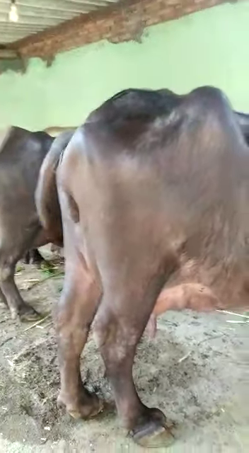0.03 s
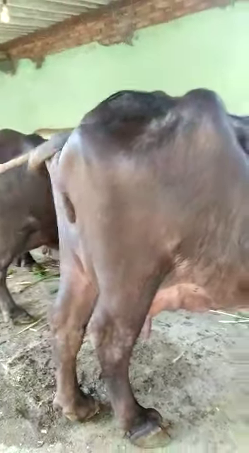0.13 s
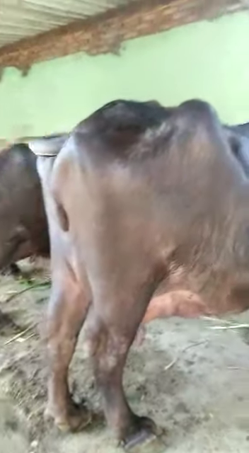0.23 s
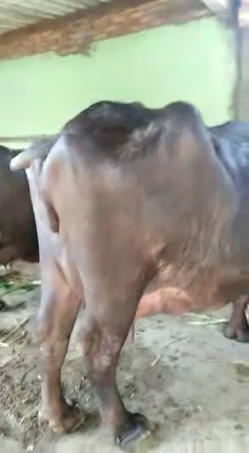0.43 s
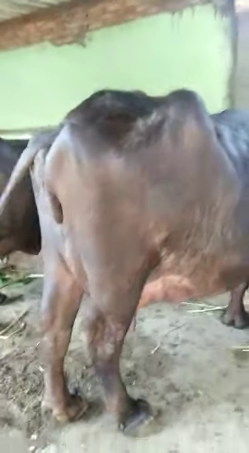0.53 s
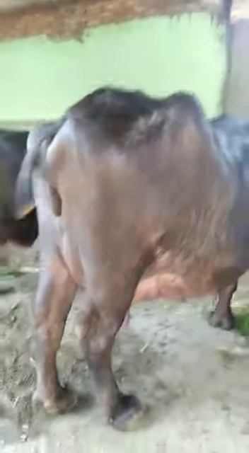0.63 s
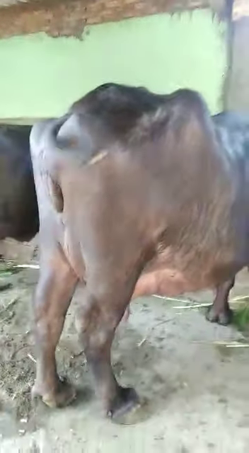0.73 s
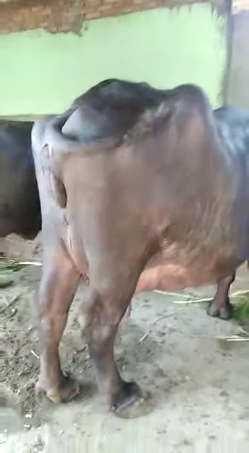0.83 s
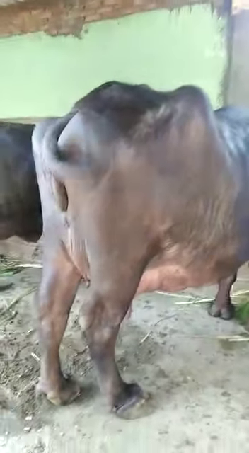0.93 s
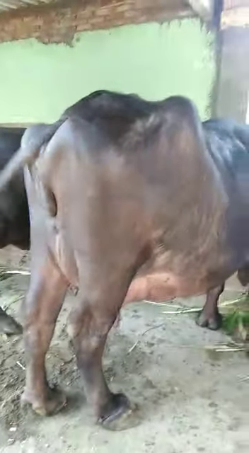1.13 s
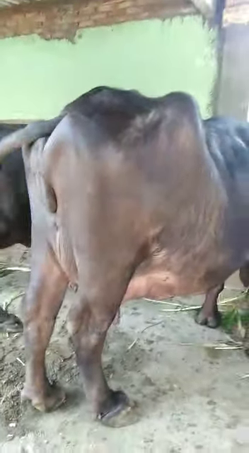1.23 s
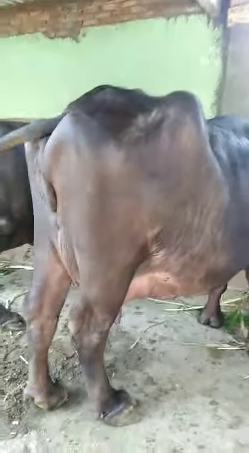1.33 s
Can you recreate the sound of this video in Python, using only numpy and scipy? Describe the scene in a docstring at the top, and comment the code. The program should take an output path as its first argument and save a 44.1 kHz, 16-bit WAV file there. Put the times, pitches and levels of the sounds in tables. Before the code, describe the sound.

A sharp knock with a bright clatter is followed at once by a hollow thud and a brief low ring. Then cattle shift softly on a littered shed floor, heard through a small microphone over constant hiss.

```python
"""A livestock shed, steady hiss throughout. At 0.22 s something hard takes a sharp, ringing knock.
From 0.33 s it bumps down with a hollow, rattling thud; low resonances hang on, one climbing in pitch.
Then cattle scuff and rustle on the littered floor, with one faint tap at 0.87 s.
Contacts and resonances are decaying sines; clatter and scuffs are grains of tiny impacts in noise.
A small two-port microphone hears it all."""
import sys
import numpy as np
from scipy import signal
from scipy.fft import rfft, irfft, next_fast_len
from scipy.io import wavfile
from scipy.ndimage import uniform_filter1d

SR = 44100
rng = np.random.default_rng(int(sys.argv[2]) if len(sys.argv) > 2 else 0)


def put_to_file(sound):
    """Save the sound as 16-bit audio at rate SR, in the file named by the first command-line argument."""
    columns = np.atleast_2d(sound).T  # one column per channel
    safe = np.clip(columns, -1, 1)
    whole_steps = np.round(safe * 32767)
    wavfile.write(sys.argv[1], SR, whole_steps.astype(np.int16))


N = 61739
TIME_S = np.arange(N) / SR

# Contacts of knock, thud and late tap (start [s], level [dB], pitch [Hz], t60 [s])
CONTACT_MODES = [(.2199, -22, 750, .009), (.2203, -30, 2700, .006), (.2222, -23, 1900, .008),
                 (.2226, -22, 4100, .014), (.2228, -26, 7000, .008), (.2222, -29.5, 320, .045),
                 (.2277, -28, 7200, .012), (.3208, -35, 640, .035), (.3212, -40, 350, .06),
                 (.3405, -32, 320, .03), (.3523, -15.5, 1550, .011), (.3595, -19.5, 1450, .008),
                 (.3855, -28, 1200, .012), (.3965, -33, 1700, .02), (.866, -51, 800, .1)]
CONTACT_RISE_CYCLES, LOW_CUT_HZ = 1.2, 130


def contacts():
    """Each contact rings briefly, higher and more abrupt the harder it is."""
    taps = sum(ring(start, hz, db, t60, CONTACT_RISE_CYCLES / hz) for start, db, hz, t60 in CONTACT_MODES)
    return signal.sosfilt(signal.butter(4, LOW_CUT_HZ, "highpass", fs=SR, output="sos"), taps)


# Crack, clatter (start [s], level [dB], attack [s], hold [s], sag [dB/s], release [dB/s])
KNOCK_BURSTS = [(.2202, -28.3, .003, .007, 150, 900), (.2342, -30.8, .002, .032, 135, 660)]
# Clatter spectrum (frequency [Hz], relative density [dB])
KNOCK_SPECTRUM = [(50, -39), (115, -22), (165, -5.5), (250, -9.5), (430, 0), (550, -11), (760, -8),
                  (1300, -15), (1700, -9), (2800, -7.5), (3270, -15), (3900, -1.5), (4500, -3), (5400, -8),
                  (7600, -8), (8500, -24.5), (15000, -39)]


def knock():
    """A crack, then a bright, dense clatter that stops short."""
    return sum(envelope(*burst) for burst in KNOCK_BURSTS) * colour(grains(), KNOCK_SPECTRUM)


# Rattle (start [s], level [dB], attack [s], hold [s], sag [dB/s], release [dB/s])
THUD_BURST = (.326, -34.5, .038, .014, 50, 190)
# Rattle spectrum (frequency [Hz], relative density [dB])
THUD_SPECTRUM = [(40, -41), (90, -18), (150, -2), (350, -3), (500, -.5), (780, -5), (950, -8), (1200, -4),
                 (1750, -3), (2050, -8), (2400, -15), (4300, -18.5), (7500, -23), (8500, -39), (15000, -57)]


def thud():
    """A dull rattle swells and dies as the object bumps down."""
    return envelope(*THUD_BURST) * colour(grains(), THUD_SPECTRUM)


# Knocked object's modes (frequency [Hz], level [dB], t60 [s])
HARD_MODES = [(176, -43, .26), (441, -36, .14), (743, -37.5, .19), (834, -44, .2), (2380, -42, .13),
              (3947, -38, .11), (4587, -36, .12), (4755, -41, .12), (6024, -41, .1)]
# Hollow body's modes (frequency [Hz], level [dB], t60 [s])
HOLLOW_MODES = [(475, -37, .27), (538, -38, .25), (617, -38, .19), (786, -40, .16), (930, -42, .22),
                (1125, -37, .19), (1245, -37, .16), (1671, -38, .19)]


def ringing():
    """The knock rings the hard object, the thud its hollow body."""
    hard = sum(ring(.2212, hz, db, t60, rise_s=.002) for hz, db, t60 in HARD_MODES)
    hollow = sum(ring(.357, hz, db, t60, rise_s=.006) for hz, db, t60 in HOLLOW_MODES)
    return hard + hollow


# Low resonances (start [s], frequency [Hz], level [dB], rise [s], t60 [s])
BOOM_MODES = [(.353, 208, -21, .016, .13), (.383, 138, -39.5, .015, .28), (.58, 250, -52, .02, .25)]


def boom():
    """Low resonances build after the thud and hang on."""
    return sum(ring(start, hz, db, t60, rise) for start, hz, db, rise, t60 in BOOM_MODES)


# Low ring (start [s], level [dB], attack [s], hold [s], sag [dB/s], release [dB/s])
WOBBLE_BURST = (.4, -36, .014, .125, 120, 480)
WOBBLE_FROM_HZ, WOBBLE_TO_HZ, CLIMB_AT_S, CLIMB_S = 208, 255, .465, .014
WOBBLE_DEPTH, WOBBLE_RATE_HZ = .36, 35


def wobble():
    """A low ring slides up in pitch and flutters unevenly as it fades."""
    climb = (1 + np.tanh((TIME_S - CLIMB_AT_S) / CLIMB_S)) / 2
    pitch_hz = WOBBLE_FROM_HZ + (WOBBLE_TO_HZ - WOBBLE_FROM_HZ) * climb
    phase = 2 * np.pi * np.cumsum(pitch_hz) / SR
    flutter_band = np.exp(-10 * np.log((np.fft.rfftfreq(N, 1 / SR) + 1) / WOBBLE_RATE_HZ) ** 2)
    in_phase, quadrature = WOBBLE_DEPTH * unit(irfft(rfft(rng.standard_normal((2, N))) * flutter_band, N))
    return envelope(*WOBBLE_BURST) * ((1 + in_phase) * np.sin(phase) + quadrature * np.cos(phase))


# Scuffs (centre [s], half-width [s], body [dB], grit [dB], hiss [dB])
SCUFF_SWELLS = [(.075, .045, -57.5, -65, -69), (.535, .012, -68, -60, -58), (.665, .055, -54.5, -59, -51.5),
                (.785, .05, -67, -56, -58), (.89, .07, -61, -51.5, -54), (1.055, .07, -57.5, -57.5, -61),
                (1.329, .022, -57.5, -49, -49), (1.385, .07, -68, -61, -55)]
# Scuff layer spectra (frequency [Hz], relative density [dB])
BODY_SPECTRUM = [(60, -30), (180, 0), (400, -1), (800, 0), (1200, -12), (3000, -35)]
GRIT_SPECTRUM = [(400, -30), (1000, -6), (1700, 0), (2200, -6), (2900, -5), (3500, -18), (9000, -40)]
HISS_SPECTRUM = [(1500, -30), (3500, -14), (4300, 0), (7500, -1), (8500, -17), (15000, -27)]


def scuffs():
    """Soft swells of grains as cattle shift on dirt and straw."""
    layers = [colour(grains(), spectrum) for spectrum in (BODY_SPECTRUM, GRIT_SPECTRUM, HISS_SPECTRUM)]
    out = np.zeros((2, N))
    for centre_s, half_width_s, *levels_db in SCUFF_SWELLS:
        out += swell(centre_s, half_width_s) * sum(amp(db) * layer for db, layer in zip(levels_db, layers))
    return out


# Distant tones (centre [s], half-width [s], pitch [Hz], level [dB])
FAR_TONES = [(.185, .045, 4550, -59), (1.245, .055, 400, -62.5)]


def far_tones():
    """Two faint, brief tones from far off."""
    return sum(amp(db) * swell(centre_s, half_width_s) * np.sin(2 * np.pi * hz * TIME_S)
               for centre_s, half_width_s, hz, db in FAR_TONES)


# Yard noise spectrum (frequency [Hz], relative density [dB])
YARD_SPECTRUM = [(25, -41), (55, -28), (95, -4), (170, 1), (300, -2.5), (800, -9), (1700, -11), (2700, -10),
                 (3500, -17), (4400, -9), (7500, -11), (8500, -25), (15000, -38)]
# Shelf gains (time [s], bass [dB], treble [dB])
YARD_DRIFT = [(0, 1, -6), (.2, -1, -2.5), (.5, -1, -4), (.62, 0, 2), (.8, 1, 0), (.92, -6, 0),
              (1.12, -6, 1), (1.27, -1, 3.5), (1.4, -5, 2)]
YARD_DB, PATCH_DB, BASS_HZ, TREBLE_HZ = -56.5, 2.4, 600, 3000


def background():
    """Steady yard noise with faint patches; its bass sinks and its treble rises a little."""
    noise = colour(rng.standard_normal((2, N)), YARD_SPECTRUM)
    hz, frame_s, spectra = signal.stft(noise, SR, nperseg=512)
    patches = uniform_filter1d(rng.standard_normal(spectra.shape[1:]), size=7, axis=0)
    patches = unit(uniform_filter1d(patches, size=9, axis=1))
    drift_s, bass_db, treble_db = np.transpose(YARD_DRIFT)
    bass = np.outer(1 / (1 + (hz / BASS_HZ) ** 2), np.interp(frame_s, drift_s, bass_db))
    treble = np.outer(hz ** 4 / (hz ** 4 + TREBLE_HZ ** 4), np.interp(frame_s, drift_s, treble_db))
    spectra *= amp(PATCH_DB * patches + bass + treble)
    return amp(YARD_DB) * signal.istft(spectra, SR, nperseg=512)[1][:, :N]


GRAIN_SPREAD_DB, GRAINS_PER_S, BLUR_SHARE = 3, 2500, .62


def grains():
    """Two streams of dense tiny impacts of uneven size, blurred by the shed."""
    sizes = amp(GRAIN_SPREAD_DB * np.minimum(rng.exponential(1, (2, N)), 4))
    signs = rng.choice([-1, 1], (2, N))
    clicks = unit(sizes * signs * (rng.random((2, N)) < GRAINS_PER_S / SR))
    return np.sqrt(1 - BLUR_SHARE) * clicks + np.sqrt(BLUR_SHARE) * rng.standard_normal((2, N))


def ring(start_s, hz, db, t60_s, rise_s):
    """One decaying mode."""
    age_s = np.maximum(TIME_S - start_s, 0)
    return np.minimum(age_s / rise_s, 1) * amp(db - 60 * age_s / t60_s) * np.sin(2 * np.pi * hz * age_s)


def envelope(start_s, db, attack_s, hold_s, sag_db_per_s, release_db_per_s):
    """Attack, sagging hold, release."""
    age_s = np.maximum(TIME_S - start_s, 0)
    sag_db = sag_db_per_s * np.clip(age_s - attack_s, 0, hold_s)
    release_db = release_db_per_s * np.maximum(age_s - attack_s - hold_s, 0)
    return np.minimum(age_s / attack_s, 1) * amp(db - sag_db - release_db)


def swell(centre_s, half_width_s):
    """Gaussian envelope, peak 1."""
    return np.exp(-2 * ((TIME_S - centre_s) / half_width_s) ** 2)


def colour(noise, spectrum):
    """Spectrally shaped noise, rms 1."""
    return unit(irfft(rfft(noise) * amp(lookup(spectrum, np.fft.rfftfreq(N, 1 / SR))), N))


def lookup(table, hz, column=1):
    """Table column interpolated over log frequency."""
    columns = np.transpose(table)
    return np.interp(np.log(hz + 1), np.log(columns[0]), columns[column])


def amp(db):
    """Decibels to gain."""
    return 10 ** (np.asarray(db) / 20)


def unit(x):
    """Scale to rms 1."""
    return x / np.sqrt(np.mean(x ** 2) + 1e-20)


# Microphone ports (frequency [Hz], left lead [rad], left minus right [dB], coherence [0-1])
PORT_RESPONSE = [(60, 0, -2.5, .85), (500, .1, -3.5, .85), (1400, -.8, -2, .85), (2600, -2.25, -3.3, .9),
                 (4200, -2.1, -6, .45), (7500, -3.2, -5, .25), (11000, -3.5, 1.5, 0)]


def microphone(diffuse, direct):
    """The left port is mostly later and softer; diffuse treble differs between the ports."""
    size = next_fast_len(N + 4096)
    hz = np.fft.rfftfreq(size, 1 / SR)
    lead_rad, balance_db, coherence = (lookup(PORT_RESPONSE, hz, column) for column in (1, 2, 3))
    tilt = amp(balance_db / 2)
    common, independent = rfft(diffuse, size)
    direct_bins = rfft(direct, size)
    left = direct_bins + coherence * common + np.sqrt(1 - coherence ** 2) * independent
    right = direct_bins + common
    return irfft(np.array([left * tilt * np.exp(1j * lead_rad), right / tilt]), size)[:, :N]


def scene():
    """Diffuse noise and direct ringing meet at the microphone."""
    diffuse = knock() + thud() + scuffs() + background()
    direct = contacts() + ringing() + boom() + wobble() + far_tones()
    return microphone(diffuse, direct)


BAND_LIMIT_HZ = 15800


def record(dry):
    """Steep low-pass at the band limit."""
    lowpass = signal.firwin(511, BAND_LIMIT_HZ, window=("kaiser", 9), fs=SR)
    return signal.oaconvolve(dry, lowpass[None], "same")


dry = scene()
out = record(dry)
put_to_file(out)
```